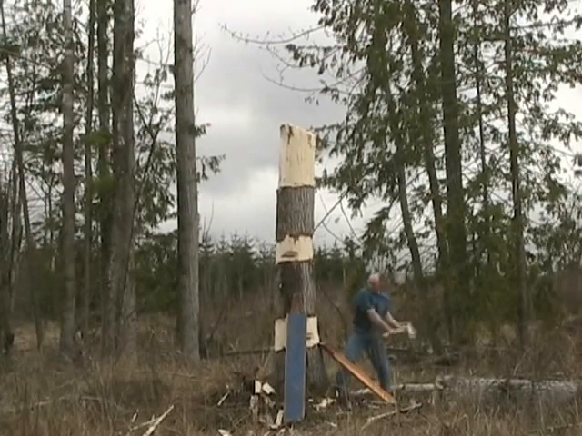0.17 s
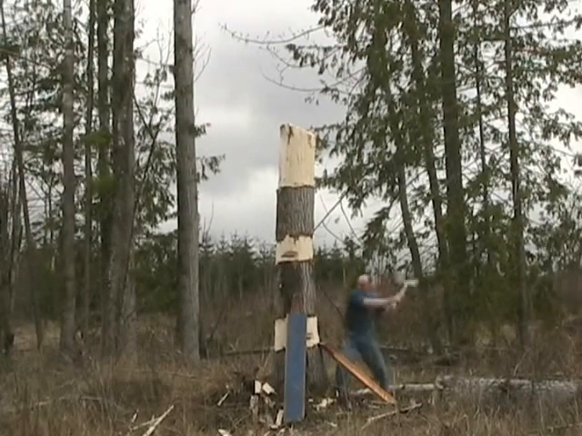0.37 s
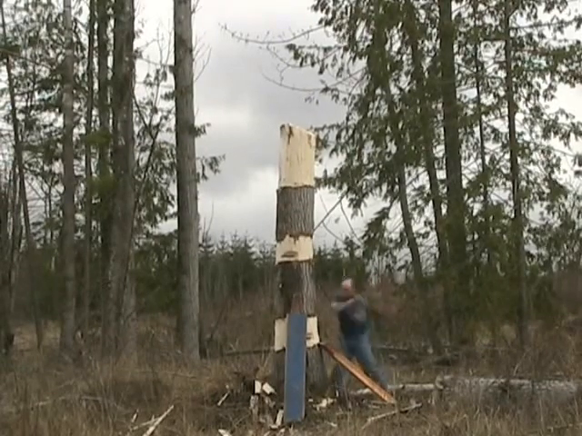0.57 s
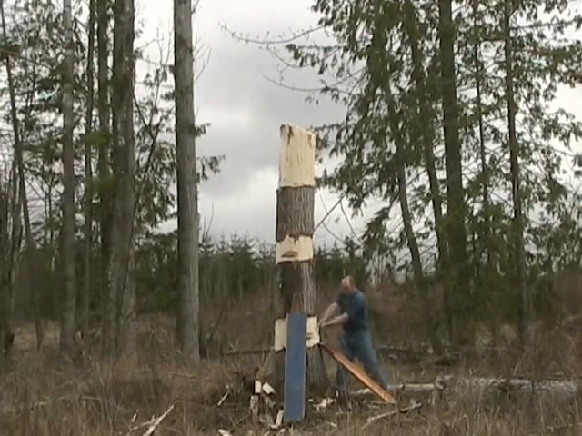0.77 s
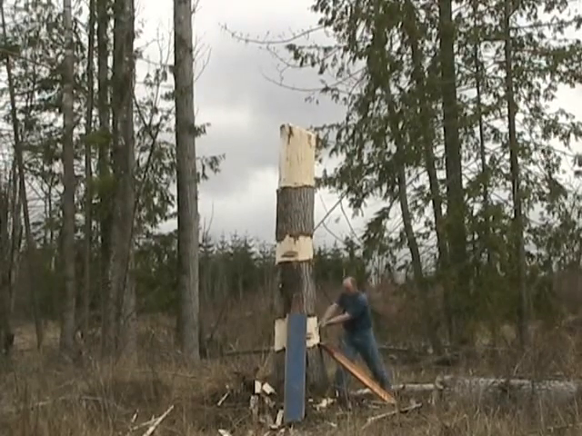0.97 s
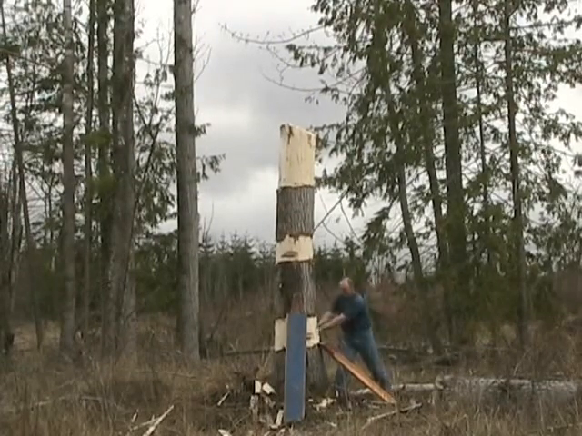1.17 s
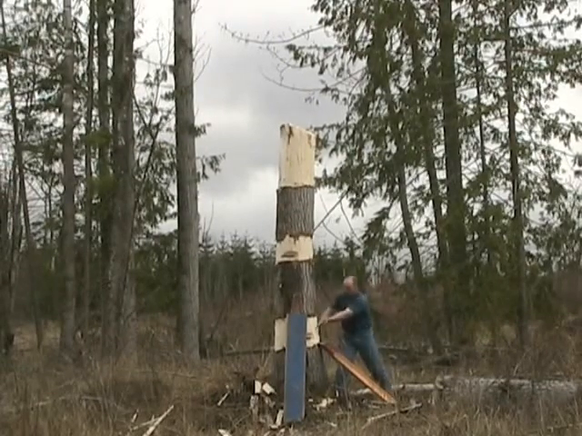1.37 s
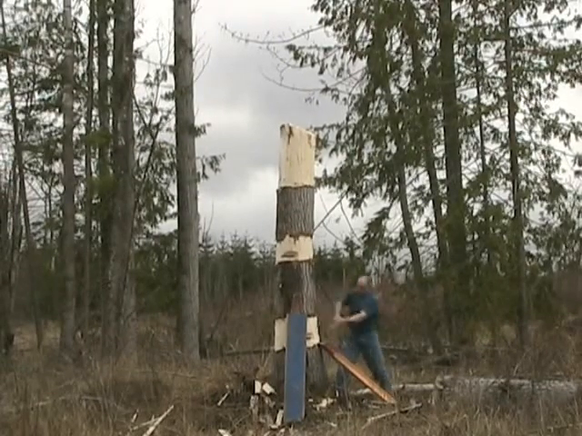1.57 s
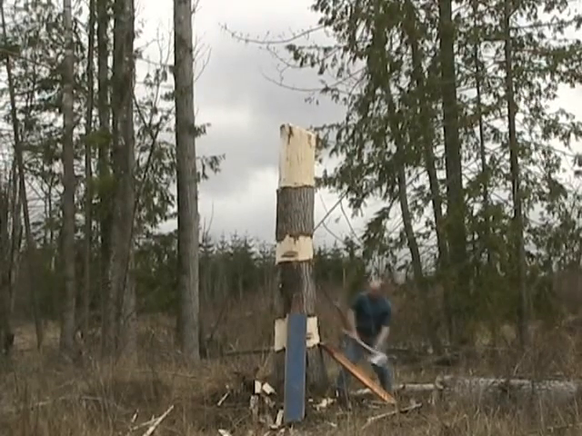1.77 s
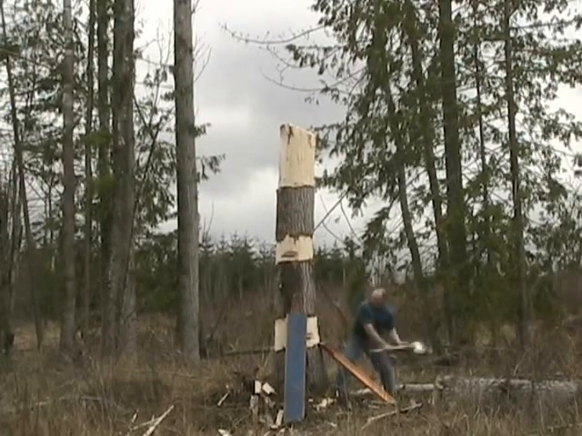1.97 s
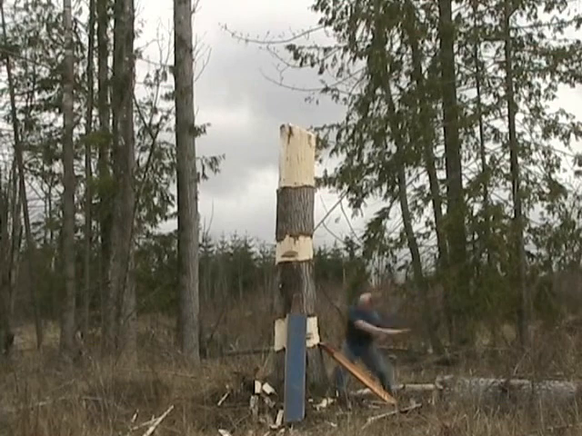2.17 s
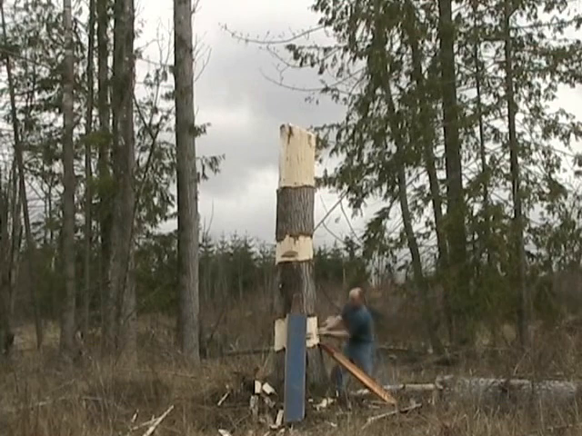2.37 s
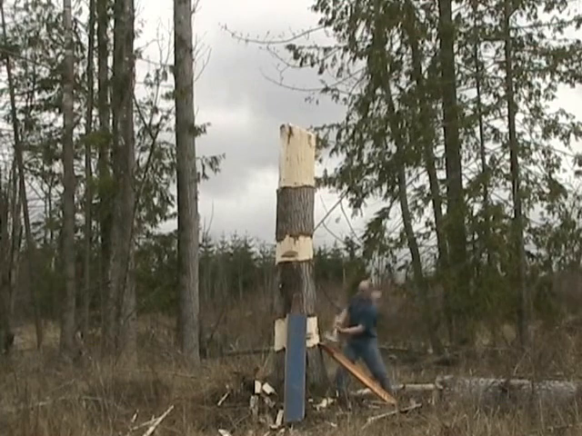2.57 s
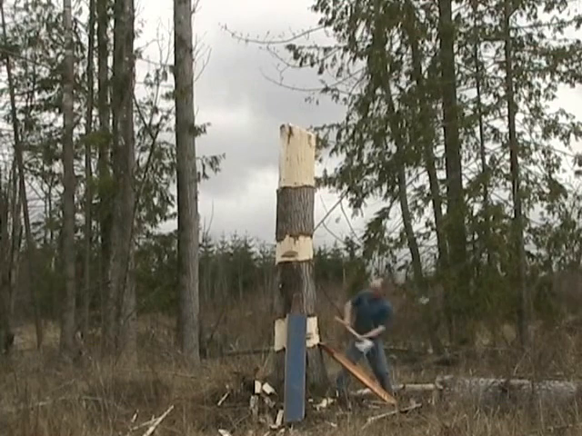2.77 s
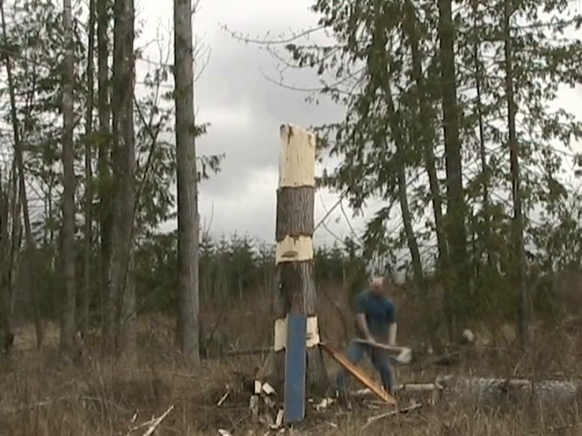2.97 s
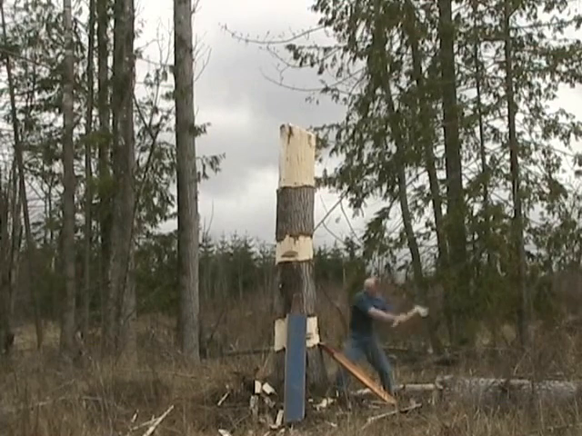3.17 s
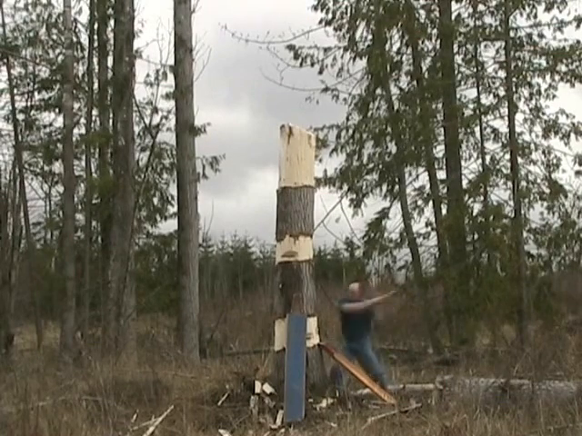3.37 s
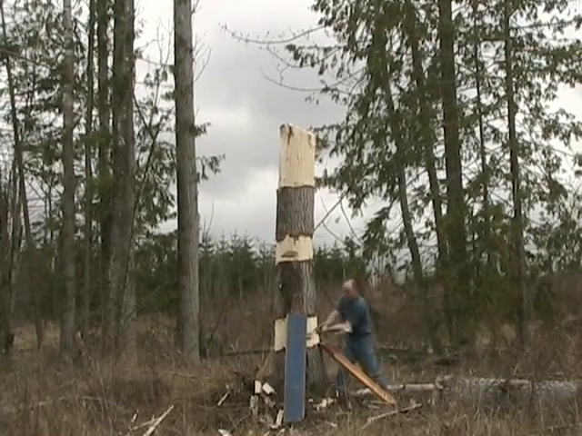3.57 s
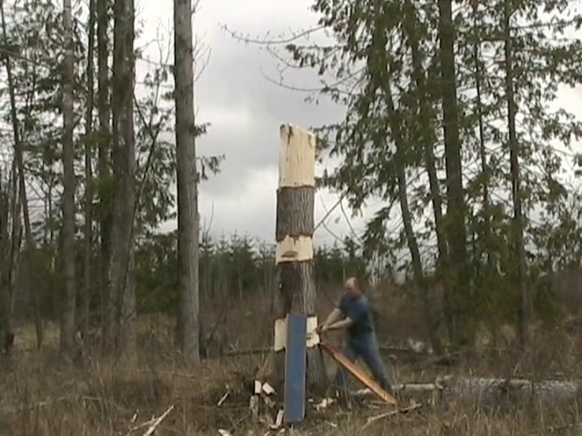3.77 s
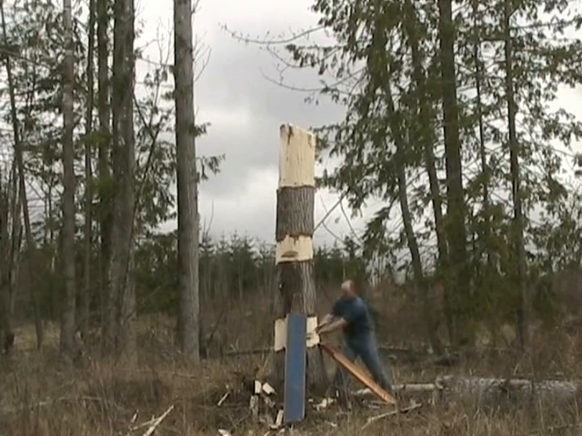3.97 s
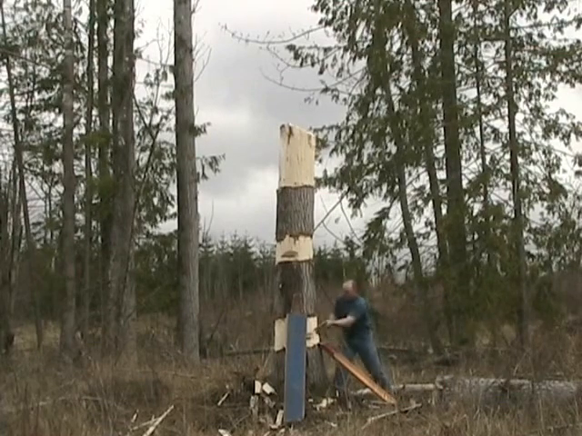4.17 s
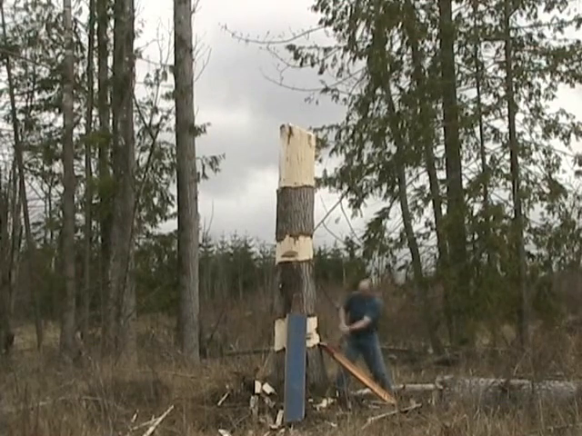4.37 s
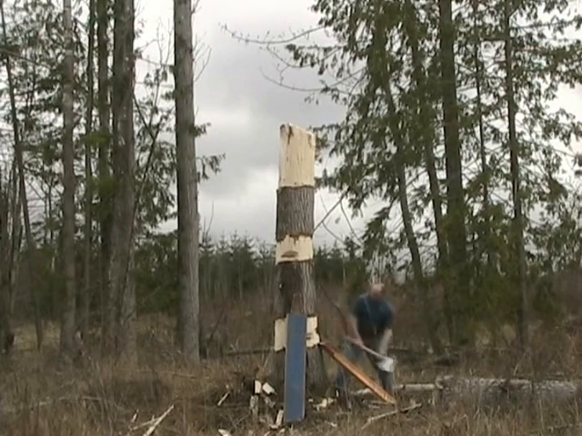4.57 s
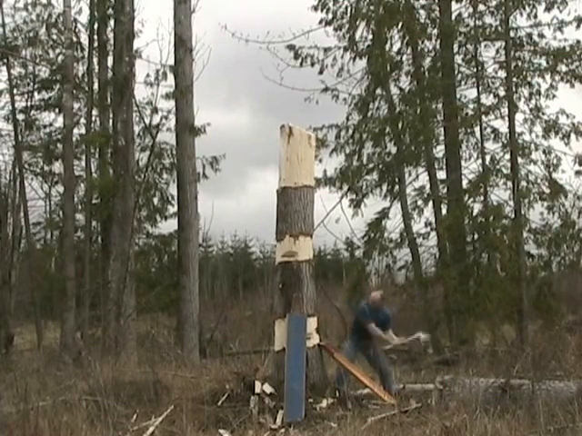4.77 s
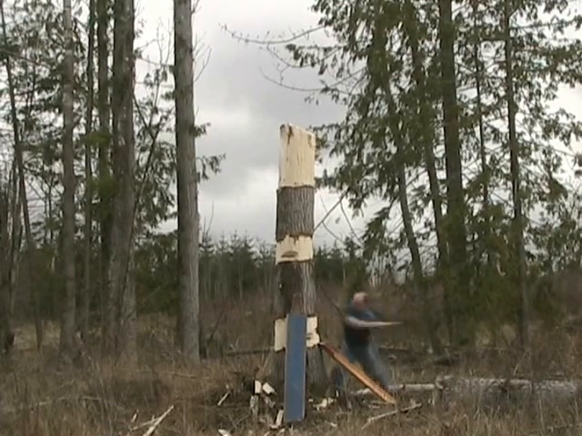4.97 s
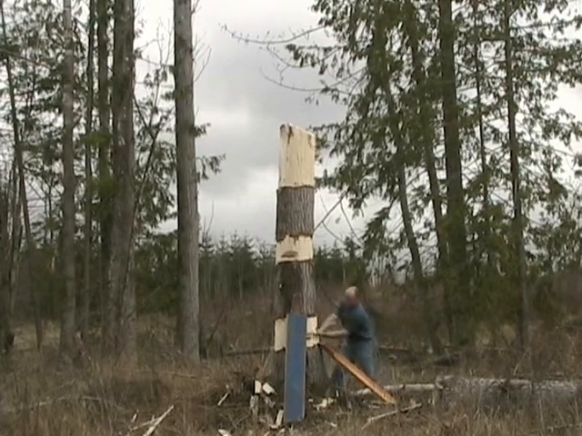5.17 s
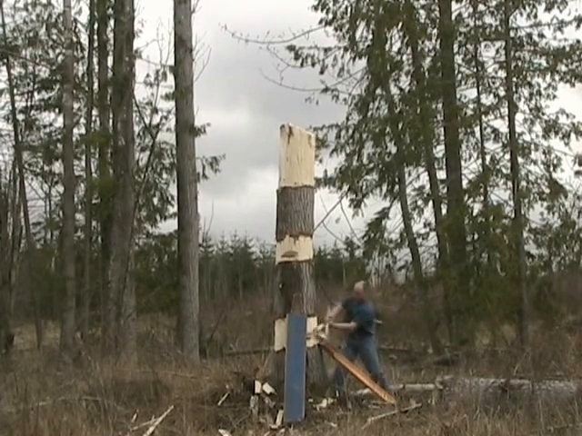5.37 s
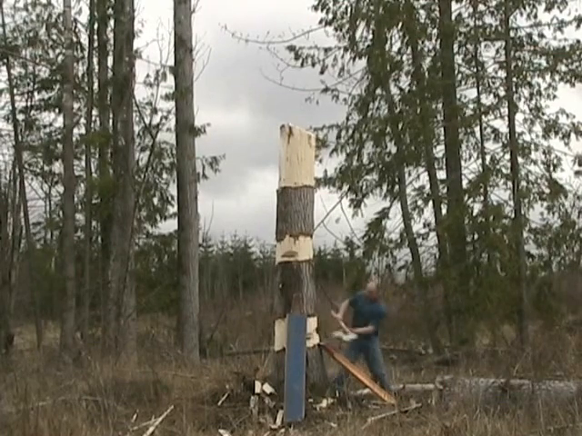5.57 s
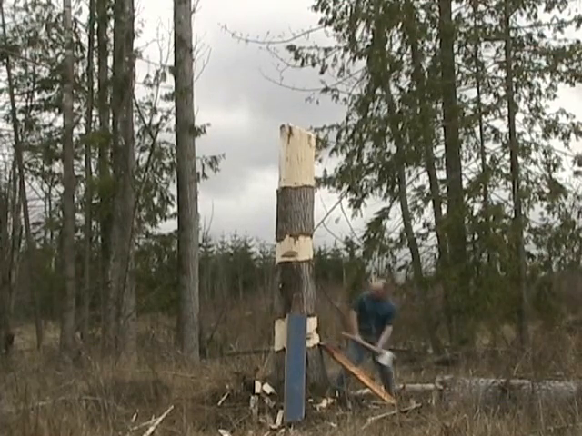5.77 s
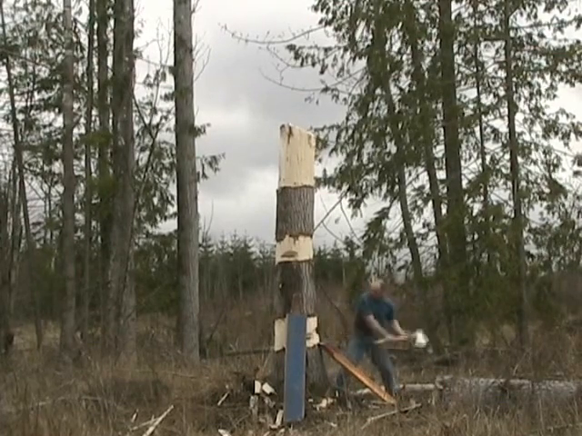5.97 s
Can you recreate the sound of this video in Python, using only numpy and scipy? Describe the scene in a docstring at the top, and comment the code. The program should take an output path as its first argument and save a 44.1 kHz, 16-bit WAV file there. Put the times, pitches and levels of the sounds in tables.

```python
"""Axe on an upright log

Forest clearing, two-channel microphone: an axe bites four times into a tall log and overloads the input.
Bursts of snapping fibres ring the modes of log and slab; ground and trees scatter each blow back as
delayed, dulled noise. Far off a bird sings two phrases of gliding tones, and a few chips land with short ticks.
Gusts buffet the microphone as lumpy low noise; the camera adds shaped hiss and a faint whine of wavering sines.
"""
import sys
import numpy as np
from scipy import signal
from scipy.fft import rfft, irfft, next_fast_len
from scipy.io import wavfile

SR = 44100
rng = np.random.default_rng(int(sys.argv[2]) if len(sys.argv) > 2 else 0)


def unload_audio(sound):
    """Save the sound as a 16-bit wav file, at the path given as the first command line argument."""
    columns = np.transpose(np.atleast_2d(sound))
    # keep every value between -1 and 1, then stretch to whole-number steps
    steps = np.round(np.clip(columns, -1, 1) * 32767)
    wavfile.write(sys.argv[1], SR, steps.astype(np.int16))


N = 265923
TIME = np.arange(N) / SR   # s

# All levels in the tables are relative; the functions set the final balance.
# Camera hiss, spectral shape: [f/Hz, level/dB per Hz]
HISS_COLOUR = [(60, -9.5), (300, -3.5), (620, 0), (900, -4), (1300, 0), (1900, -4.5), (3100, -5.5),
               (4500, -6), (6500, -6), (10000, -8.5), (10700, -24.5), (14000, -25.5), (16000, -32)]
# Camera motor lines: [f/Hz, level/dB]
MOTOR_LINES = [(590, -68), (1346, -67), (2239, -67.5), (2692, -68.5), (3108, -60.5), (3138, -64),
               (3994, -70), (4662, -65), (5825, -79), (6277, -65.5), (8339, -62.5)]
# Wind in opposite phase left and right, spectral shape: [f/Hz, level/dB per Hz]
BUFFET_COLOUR = [(12, -14), (22, -34), (53, -0.5), (93, -6.5), (169, -13), (280, -21), (450, -32),
                 (900, -42.5), (3000, -123)]
# Wind in phase left and right, spectral shape: [f/Hz, level/dB per Hz]
RUMBLE_COLOUR = [(12, -43), (25, -7), (60, 3), (100, 2.5), (170, -3), (280, -11), (450, -19.5),
                 (900, -29.5), (3000, -62)]
# Wind strength at the microphone: [t/s, opposite-phase level/dB, in-phase level/dB]
WIND = [(0, -35.5, -45), (0.3, -31.5, -43.5), (0.5, -42.5, -50.0), (0.95, -42.5, -52.0),
        (1.15, -30.5, -46.5), (1.33, -43.0, -55.0), (1.69, -27, -40.5), (1.9, -65, -55.0), (2.22, -50, -49),
        (3.048, -64, -65.5), (3.42, -37.0, -50), (3.599, -57, -59), (3.85, -38.5, -49.0),
        (4.05, -45, -58.5), (4.72, -37, -58), (5.22, -46.0, -64), (5.35, -24.5, -47.5),
        (5.52, -18.5, -37.5), (5.62, -38, -47.5), (5.8, -39.5, -51.5), (5.93, -23, -35.5),
        (6.03, -32.5, -26)]
# Axe blows: [t/s, force level/dB, bite length/s, crack level/dB, low, middle and high mode levels/dB,
# loosened slab f/Hz, slab level/dB, low thump level/dB, level thrown to the forest/dB]
BLOWS = [(0.7847, 2, 0.0046, -4, -4, 1, -46, 946, -4, -37, 0),
         (2.4813, -2, 0.00402, 6.5, 2, -5, 16, 1525, 3, -1.5, 0.5),
         (3.6437, -0.5, 0.00369, 3, 3, -0.5, -1, 1038, 1, -57, -2),
         (5.2449, 0.5, 0.0047, 6.5, 3, 6, 2, 1282, -7, -16.5, -2.5)]
# Ringing modes of the log: [f/Hz, level/dB, t60/s]
LOG_MODES = [(200, -29.5, 0.081), (434.8, -11, 0.063), (502, -20, 0.093), (604, -14, 0.053),
             (737, -10, 0.045), (828.4, -8, 0.054), (914, -11.5, 0.027), (957, -19.5, 0.18),
             (1222, 3, 0.0081), (1360, -16, 0.0046), (1650, -15, 0.0065), (1700, -8, 0.012),
             (2176, -7.5, 0.003), (2560, -21, 0.01), (3260, -15.5, 0.012), (3800, -52, 0.0031)]
# Colour of splitting fibres: [f/Hz, level/dB]
CRACK_COLOUR = [(60, -30), (300, 0.5), (800, 12.5), (1500, 12), (2000, 9), (2800, 7), (4000, 3.5),
                (5300, 1.5), (6800, 5), (9000, 3), (11000, -1), (15000, -43)]
# Single echoes off the ground, stumps and nearest trunks: [delay t/s, level/dB, top f/Hz]
NEAR_ECHOES = [(.0055, -11, 1830), (0.0222, -11.5, 1340), (.047, -20, 2500), (.057, -21, 2770),
               (0.072, -25, 1810)]
# Stands of trees that each throw back a clump of echoes: [delay t/s, level/dB]
STANDS = [(0.055, -3.5), (.072, -6), (.1, -10), (.15, -6.5), (0.178, -10), (0.228, -8.5), (.255, -13),
          (.278, -12.5), (.32, -15), (0.439, -22), (0.589, -22), (.67, -25.5)]
# Colour of the forest's scatter, with the dip of soft ground: [f/Hz, level/dB]
FOREST_COLOUR = [(100, -11), (190, -3), (290, -7.5), (420, -3), (750, 1), (1300, 3.5), (2200, 4.5),
                 (4000, 1), (8000, -3), (10000, -4.5), (12000, -17)]
# Directions from which the forest answers: [left minus right level/dB, share level/dB]
DIRECTIONS = [(4, -6), (-2.5, -5), (1, -4.5)]
# Swelling whistle that opens each phrase: [t/s, length/s, start f/Hz, level/dB]
WHISTLES = [(0.806, 0.233, 4710, -40), (2.887, 0.34, 4450, -46)]
# Buzzes in the song: [t/s, length/s, start f/Hz, end f/Hz, swing/Hz, swings per s, level/dB,
# loudest point/0-1]
BUZZES = [(1.106, 0.24, 5490, 5360, 414, 140, -40.5, 0.93), (3.318, 0.43, 5710, 5470, 416, 130, -45.5, 0.6),
          (4.277, .22, 4820, 4240, 304, 95, -41, .4)]
# Quick falling slurs: [t/s, end f/Hz, level/dB]
SLURS = [(1.429, 3740, -40.5), (1.58, 3280, -40.5), (1.717, 3580, -46), (1.86, 3370, -47),
         (3.859, 3600, -42), (4.008, 3650, -40), (4.164, 3550, -36.5), (4.605, 3480, -43)]
# Hooks between two slurs, a flick down and then a rise from below: [t/s, level/dB]
HOOKS = [(1.497, -44.5), (1.779, -50), (4.079, -41.5)]
# Landing chips and twigs: [t/s, level/dB, f/Hz]
CHIPS = [(3.2794, -35.5, 1360), (4.092, -23, 2600), (4.2262, -27.5, 2003), (5.443, -19, 1470),
         (5.6354, -26, 1310), (5.923, -21.5, 1850)]

HISS_DB, HISS_APART_DB = -51.5, -4   # common hiss; opposed hiss relative to it
SLAB_T60_S = 0.04
# The wash starts on the ground round the log, then dies away steadily among the trunks.
WASH_START_S, GROUND_DB, GROUND_T60_S, WASH_DB, WASH_T60_S = 0.0063, 5.5, 0.077, -10, 2.12
STAND_RISE_S, STAND_T60_S = 0.013, 0.14
WHISTLE_SAG, WHISTLE_CREST = 0.024, 0.99   # share of the pitch lost; loudest point 0-1
SLUR_S, SLUR_TOP_HZ, SLUR_CREST, SLUR_BEND = 0.043, 6550, 0.23, 2.2
FLICK_S, FLICK_END_HZ = 0.028, 4730
RISE_S, RISE_FROM_HZ, RISE_TO_HZ = 0.031, 3550, 4860
LEFT_LAG_S, CUTOFF_HZ = 0.000037, 15400


def from_db(db):
    """Turn a level in dB into an amplitude factor."""
    return 10 ** (np.asarray(db) / 20)


def add(track, s, sound):
    """Mix a sound into a track at a time in seconds."""
    at = int(round(s * SR))
    track[at:at + len(sound)] += sound[:len(track) - at]


def panned(x, pan_db):
    """Place a sound between the channels by its left minus right level."""
    return x * from_db([[pan_db / 2], [-pan_db / 2]])


def low_pass(x, hz):
    """Dull a sound above a frequency."""
    return signal.sosfilt(signal.butter(2, min(hz, 0.45 * SR), fs=SR, output="sos"), x)


def coloured(x, spectrum):
    """Filter causally (minimum phase) to the given spectrum."""
    size = 2 * next_fast_len(len(x) // 2 + 2048)
    hz, db = np.transpose(spectrum)
    grid = np.maximum(np.arange(size // 2 + 1) * SR / size, 1)
    gain = from_db(np.interp(np.log(grid), np.log(hz), db))
    # folding the cepstrum onto positive time makes the filter minimum-phase
    cepstrum = irfft(np.log(gain))
    cepstrum[1:size // 2] *= 2
    cepstrum[size // 2 + 1:] = 0
    response = np.exp(rfft(cepstrum))
    return irfft(rfft(x, size) * response)[:len(x)]


def noise(spectrum):
    """Steady random noise of the given colour and unit RMS."""
    x = coloured(rng.standard_normal(N), spectrum)
    return x / np.sqrt(np.mean(x ** 2) + 1e-20)


def drift(rate):
    """Slow chance with a spread of about 1, drawn anew rate times per second."""
    knots = rng.standard_normal(2048)
    return np.interp(TIME * rate, np.arange(len(knots)), knots)


def camera_hiss():
    """Even noise, partly common to both channels and partly in opposite phase."""
    common = from_db(HISS_DB) * noise(HISS_COLOUR)
    opposed = from_db(HISS_DB + HISS_APART_DB) * noise(HISS_COLOUR)
    return np.array([common + opposed, common - opposed])


def motor_whine(waver_rad=0.7):
    """A small motor gives thin lines whose phase wavers slightly."""
    out = np.zeros(N)
    for hz, db in MOTOR_LINES:
        phase = 2 * np.pi * hz * TIME + waver_rad * drift(8.4)
        out += from_db(db) * np.sqrt(2) * np.sin(phase)
    return out


def wind(lumpy_db=3.5, side_db=-2, mid_db=-2):
    """Eddies push on the microphone, mostly in opposite phase in the two channels."""
    s, opposed_db, common_db = np.transpose(WIND)
    eddies_db = lumpy_db * drift(30)
    side = from_db(side_db + np.interp(TIME, s, opposed_db) + eddies_db) * noise(BUFFET_COLOUR)
    mid = from_db(mid_db + np.interp(TIME, s, common_db) + eddies_db) * noise(RUMBLE_COLOUR)
    return panned(np.array([mid + side, mid - side]), -1)


def ring(force, hz, t60):
    """A mode: a unit click sets a decaying sine of height 1 ringing."""
    r, w = from_db(-60 / (t60 * SR)), 2 * np.pi * hz / SR
    return signal.lfilter([0, np.sin(w)], [1, -2 * r * np.cos(w), r * r], force + 1e-18)


def fibres(t, length):
    """Fibres snap in a dense burst that builds as the blade enters and ends as it stops; unit energy."""
    u = t / length
    uneven = from_db(6.4 * rng.standard_normal(len(t)))
    envelope = np.minimum(4 * u, 1) * np.exp(-u ** 2)
    snaps = rng.standard_normal(len(t)) * uneven * envelope
    return snaps / np.sqrt(np.sum(snaps ** 2))


def axe(shape_db=0, crunch=0.13, crack_db=13, slab_db=-6, thump_hz=135, thump_t60=0.0097):
    """The blade's shock and the snapping fibres ring the log and the slab being cut loose.

    Off the direct line each mode radiates more or less strongly, by about shape_db.
    """
    out, t = np.zeros(N), np.arange(SR // 4) / SR
    radiation = signal.butter(2, 220, "high", fs=SR, output="sos")   # a narrow log radiates little bass
    for (s, force_db, bite, snap_db, low_db, middle_db, high_db,
         slab_hz, loose_db, thump_db, _) in BLOWS:
        snaps = fibres(t, bite)
        force = (t == 0) + crunch * snaps
        blow = from_db(crack_db + snap_db) * coloured(snaps, CRACK_COLOUR)
        slab = from_db(slab_db + loose_db) * ring(force, slab_hz, SLAB_T60_S)
        add(blow, bite / 2, slab)
        for k, (hz, db, t60) in enumerate(LOG_MODES):
            # where the blade lands sets the share of low, middle and high modes
            place_db = np.interp(np.log(hz), np.log([500, 790, 1390, 1960]),
                                 [low_db, 0, middle_db, high_db])
            mode_db = db + place_db + shape_db * rng.standard_normal()
            # the modes start at three staggered moments while the blade sinks in
            late = bite * (k % 3) / 4
            add(blow, late, (-1) ** k * from_db(mode_db) * ring(force, hz, t60))
        # a short low thump, strong under the second blow, as the overloaded input adds lows
        thump = from_db(thump_db) * ring(t == 0, thump_hz, thump_t60)
        add(out, s, from_db(force_db) * (signal.sosfilt(radiation, blow) + thump))
    return out


def near_echoes(x):
    """Ground, stumps and nearest trunks return a few dull, distinct reflections."""
    out = np.zeros(N)
    for delay, db, top_hz in NEAR_ECHOES:
        add(out, delay, from_db(db) * low_pass(x, top_hz))
    return out


def clump(t, delay, db, rise, t60):
    """Power of a group of echoes that builds up to its delay and then dies away."""
    decay_db = 60 * np.maximum(t - delay, 0) / t60
    build_up = np.clip(1 + (t - delay) / rise, 0, 1)
    return from_db(db - decay_db) ** 2 * build_up


def forest(x, leaf_hz=1800, treble_loss_db_per_s=24, lumpy_db=1.17):
    """Ground, trunks and stands return a lumpy wash; longer paths lose treble in the needles."""
    t = np.arange(int(1.5 * SR)) / SR
    power = clump(t, WASH_START_S, GROUND_DB, 1 / SR, GROUND_T60_S)
    power += clump(t, WASH_START_S, WASH_DB, 1 / SR, WASH_T60_S)
    for delay, db in STANDS:
        power += clump(t, delay, db, STAND_RISE_S, STAND_T60_S)
    lumps = from_db(lumpy_db * drift(110)[:len(t)])
    paths = rng.standard_normal(len(t)) * lumps * np.sqrt(power / SR)
    dull = low_pass(paths, leaf_hz)
    bright_share = from_db(-treble_loss_db_per_s * t)
    response = coloured(bright_share * paths + (1 - bright_share) * dull, FOREST_COLOUR)
    return signal.fftconvolve(x, response)[:N]


def note(length, start_hz, end_hz, crest, swing_hz=0, buzz_hz=150, bend=1.1):
    """One tone glides fast at first and then levels off; a fast swing of pitch makes it buzz."""
    t = np.arange(int(length * SR)) / SR
    u = t / length
    glide = np.expm1(-bend * u) / np.expm1(-bend)
    buzz = np.sin(2 * np.pi * buzz_hz * t) + 0.55 * drift(900)[:len(t)]
    hz = start_hz + (end_hz - start_hz) * glide + swing_hz * buzz
    swell = np.interp(u, [0, np.clip(crest, 0.05, 0.95), 1], [0, 1, 0]) ** 0.75
    return swell * np.sin(2 * np.pi * np.cumsum(hz) / SR)


def bird():
    """A phrase is gliding tones: a whistle, buzzes and a twitter of slurs and hooks."""
    out = np.zeros(N)
    for s, length, hz, db in WHISTLES:
        add(out, s, from_db(db) * note(length, hz, hz * (1 - WHISTLE_SAG), WHISTLE_CREST))
    for s, length, start_hz, end_hz, swing_hz, buzz_hz, db, crest in BUZZES:
        add(out, s, from_db(db) * note(length, start_hz, end_hz, crest, swing_hz, buzz_hz))
    for s, end_hz, db in SLURS:
        add(out, s, from_db(db) * note(SLUR_S, SLUR_TOP_HZ, end_hz, SLUR_CREST, bend=SLUR_BEND))
    for s, db in HOOKS:
        add(out, s, from_db(db) * note(FLICK_S, SLUR_TOP_HZ, FLICK_END_HZ, 0.5))
        add(out, s + FLICK_S, from_db(db) * note(RISE_S, RISE_FROM_HZ, RISE_TO_HZ, 0.38))
    return out


def chips(t60=0.0034, snap_db=-2):
    """Small pieces of wood tick with two short modes and a dry snap."""
    out, t = np.zeros(N), np.arange(SR // 10) / SR
    for s, db, hz in CHIPS:
        snaps = fibres(t, length=0.0042)
        tick = (ring(snaps, hz, t60) + ring(snaps, 1.37 * hz, t60)) / 2
        snap = from_db(snap_db) * coloured(snaps, CRACK_COLOUR)
        add(out, s, from_db(db) * (tick + snap))
    return out


def scene(blow_pan_db=1.0, bird_db=-4.0, bird_wet_db=6):
    """The log stands near the centre; the forest answers from all round and blurs the distant bird."""
    blows, song, ticks = axe(), bird(), chips()
    direct = blows + near_echoes(blows) + ticks + from_db(bird_db) * song
    air = panned(direct, blow_pan_db)
    # each blow throws its own share of sound towards the trees
    starts, echo_db = np.array(BLOWS)[:, 0], np.array(BLOWS)[:, -1]
    latest = np.maximum(np.searchsorted(starts, TIME + 0.01) - 1, 0)
    thrown = from_db(echo_db[latest])
    for pan_db, share_db in DIRECTIONS:
        # much less slab than on the direct line, and another colour in each direction
        aside = axe(shape_db=2.0, crunch=0.1, crack_db=13, slab_db=-19.5)
        outgoing = thrown * aside + ticks + from_db(bird_wet_db) * song
        air += panned(from_db(share_db) * forest(outgoing), pan_db)
    return air + camera_hiss() + motor_whine() + wind()


def record(dry):
    """The blows overload the input; the left channel lags a hair; the top is cut."""
    clipped = dry / (1 + (dry / 0.93) ** 12) ** (1 / 12)
    hz = np.arange(N + 1) * SR / (2 * N)
    lag = np.exp(-2j * np.pi * hz * np.array([[LEFT_LAG_S], [0]]))
    cut = 1 / (1 + (hz / CUTOFF_HZ) ** 30)
    return irfft(rfft(clipped, 2 * N) * lag * cut)[:, :N]


dry = scene()
out = record(dry)
unload_audio(out)
```